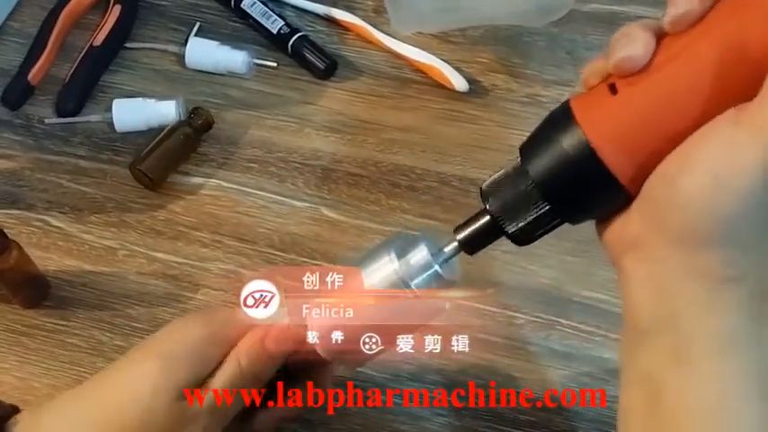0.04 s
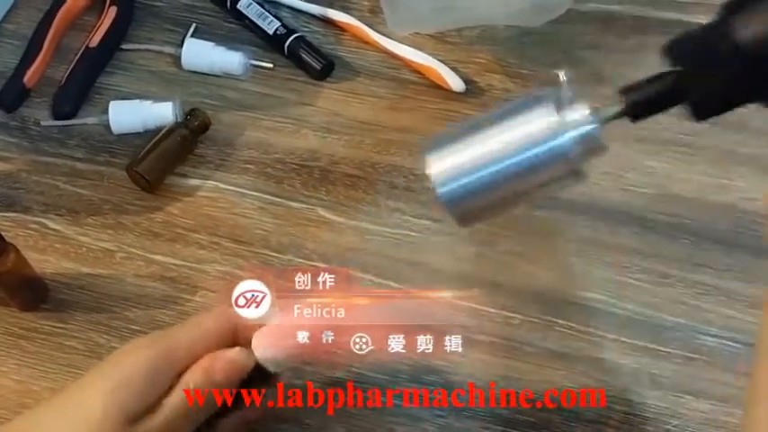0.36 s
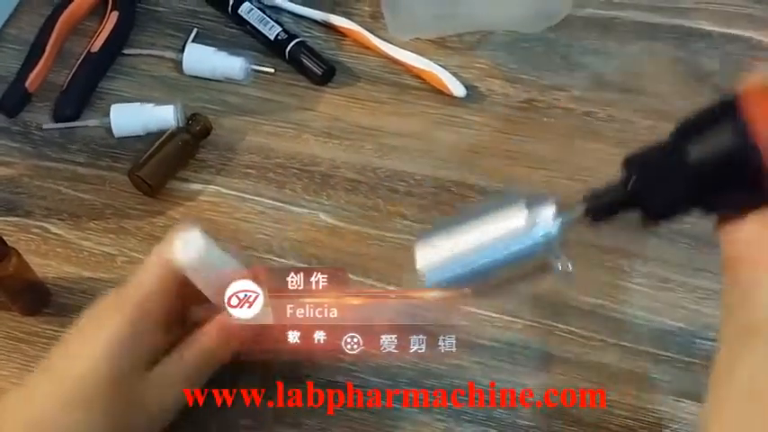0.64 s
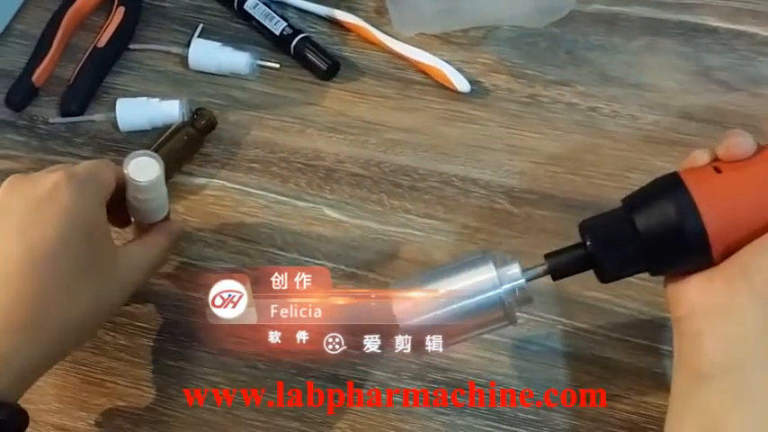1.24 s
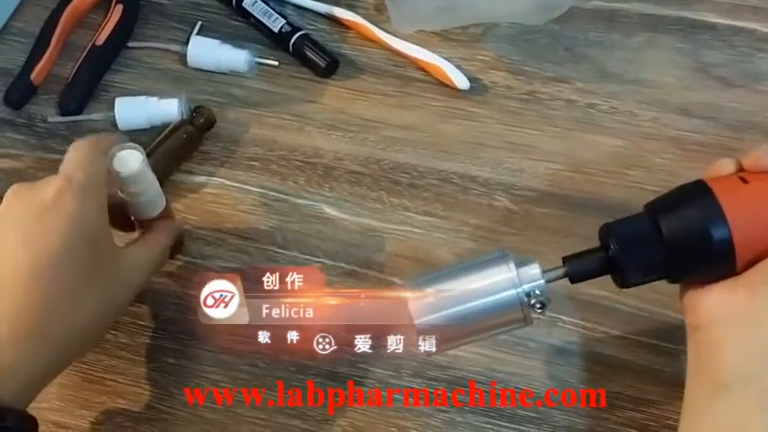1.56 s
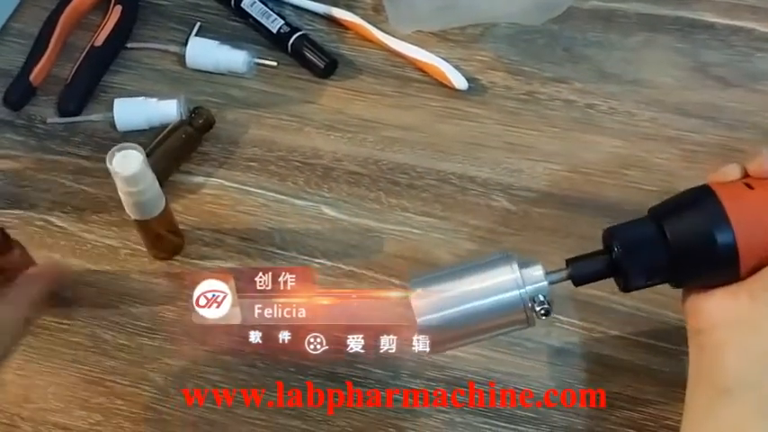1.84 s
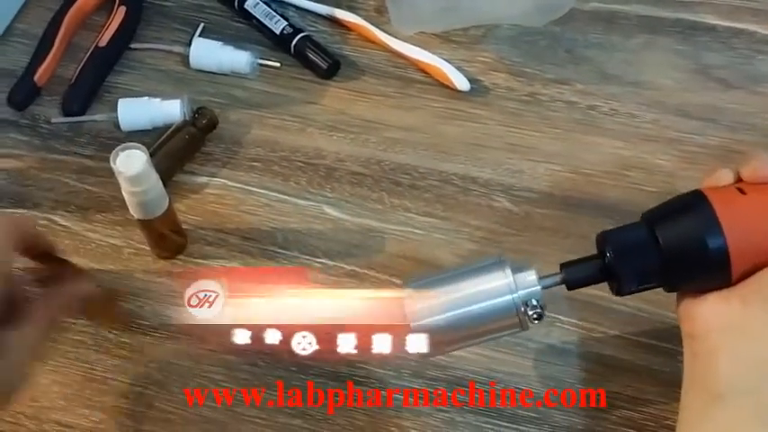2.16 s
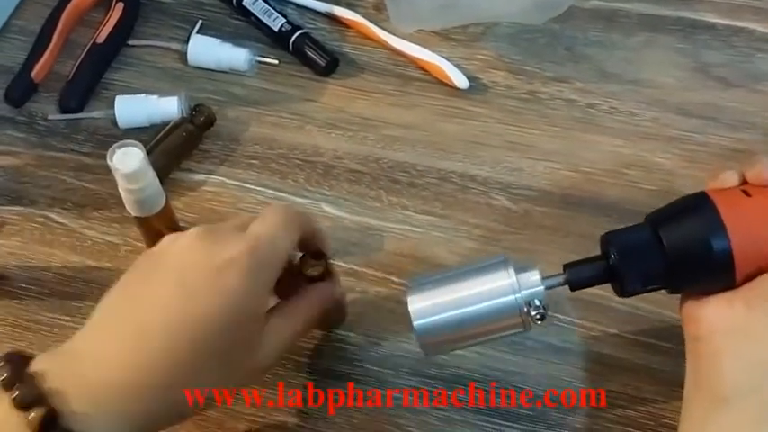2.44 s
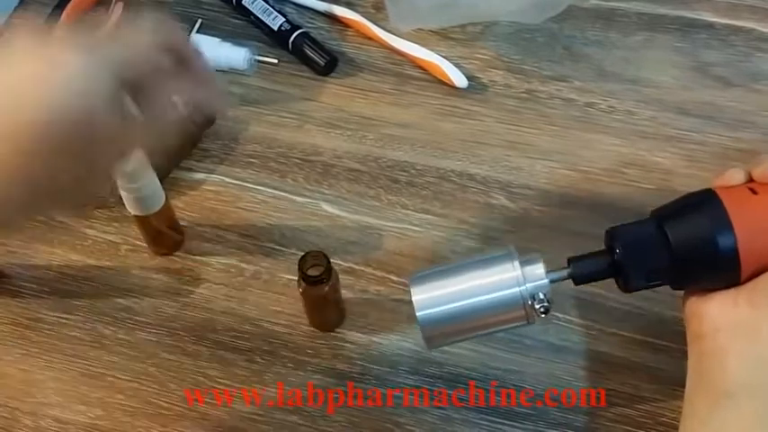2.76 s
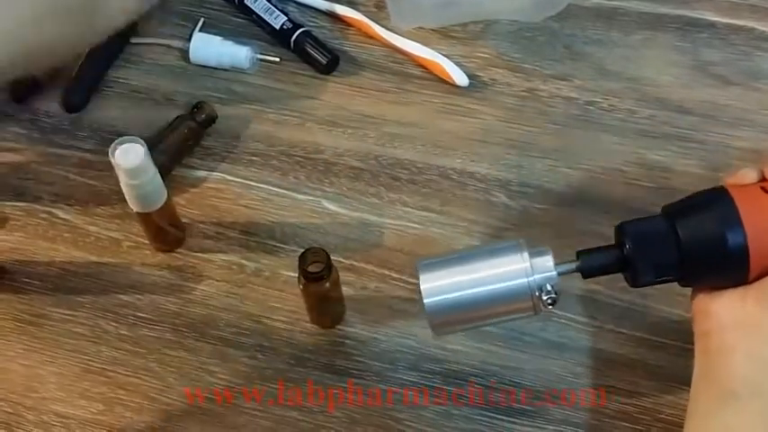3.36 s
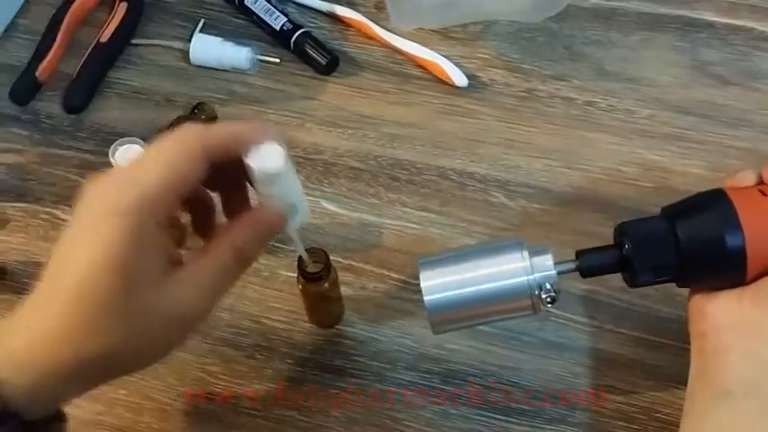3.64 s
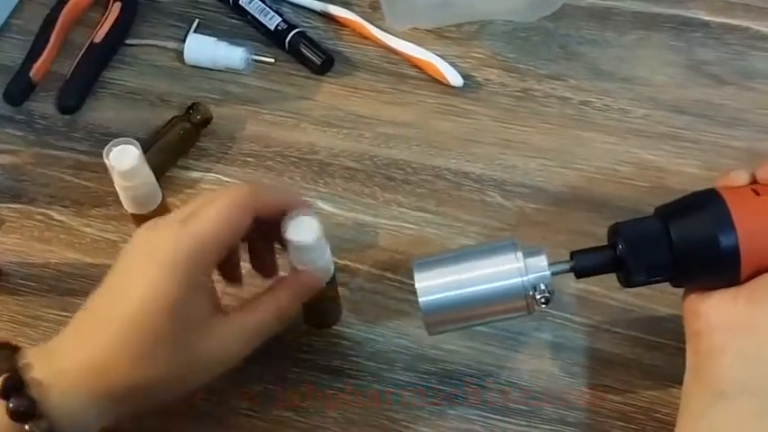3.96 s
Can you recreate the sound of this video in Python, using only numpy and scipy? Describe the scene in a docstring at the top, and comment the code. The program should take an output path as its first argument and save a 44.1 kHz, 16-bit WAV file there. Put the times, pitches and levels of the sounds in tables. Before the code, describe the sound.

Close up in a slightly echoing room, a small power tool spins, hissing and rattling, is laid on wood and coasts to a stop. Later a glass bottle knocks on the table, followed by light plastic clicks.

```python
"""Capping tool and spray bottle on a table

A handheld electric capping tool spins freely with hissing brushes, rattling gears and a squealing
bearing, is laid running on a wooden table, which drones under it, and coasts to a stop. A small glass
bottle is stood on the table, and a plastic spray head is picked up and clicks into its neck. The bare
room rings after every knock; a low hum and faint chirps, perhaps a bird outside, lie behind."""
import sys
import numpy as np
from scipy import signal
from scipy.fft import rfft, irfft
from scipy.io import wavfile

SR = 44100
rng = np.random.default_rng(int(sys.argv[2]) if len(sys.argv) > 2 else 0)


def to_wav(s):
    """Save 16-bit WAV."""
    ch = np.atleast_2d(s).T  # columns
    pcm = np.round(np.clip(ch, -1, 1) * 32767)  # PCM
    wavfile.write(sys.argv[1], SR, pcm.astype(np.int16))


N = 176400

# reverb decay by band: f/Hz, t60/s
ROOM_DECAY = [(150, 0.56), (500, 1), (1200, 0.74), (2600, 0.74), (5000, 0.69), (12000, 0.41)]
# EQ of the wall reflections: f/Hz, level/dB
WALL_EQ = [(30, 0), (3000, 0.5), (5000, -1.5), (8000, -6), (14000, -1)]
# EQ of the room tone: f/Hz, level/dB
AIR_EQ = [(15, 4), (25, -9.5), (189, -1.5), (305, -5.5), (466, -12), (577, -11.5), (772, -17.5), (837, -10),
          (956, -20), (1030, -19.5), (2070, -18), (2360, -13.5), (3080, -21.5), (3340, -25.5), (14400, -35)]
# far chirps: t/s, length/s, start f/Hz, end f/Hz, relative level/dB
CHIRPS = [(1.382, 0.071, 3037, 3143, -54.5), (1.472, .07, 9700, 8700, -59), (1.476, 0.095, 6080, 5620, -64),
          (1.54, 0.0395, 3234, 2640, -51), (1.573, 0.123, 2417, 2320, -60.5),
          (1.63, 0.098, 4700, 4390, -65.5), (2.054, 0.13, 2650, 2680, -62.5),
          (2.093, 0.057, 5930, 6010, -65.5), (2.675, 0.093, 5110, 4760, -65.5),
          (2.707, 0.087, 3920, 3480, -62.5), (2.995, 0.16, 3033, 2390, -62),
          (3.574, 0.071, 6080, 5560, -66.5), (3.558, 0.086, 2970, 3030, -65.5)]

# tool and bottle scuff the wood: t/s, level/dB, decay/s
SCUFFS = [(.925, -29.5, 0.018), (1.167, -35, 0.025), (1.84, -48, .012), (1.878, -37.5, 0.014)]
# resonances of a scuff: f/Hz, width/Hz, level/dB
SCUFF_BANDS = [(1070, 120, 0), (1240, 150, -9), (1700, 190, -15), (2500, 770, -19)]
# EQ that softens a scuff: f/Hz, level/dB
SCUFF_EQ = [(300, -11), (1000, 0), (2800, 0), (6000, -13), (14000, -18)]
# switch, cap and spray head: t/s, level/dB, tilt/(dB/octave), decay/s, ring f/Hz, relative ring level/dB
CLICKS = [(.001, -24, 2.5, 0.011, 800, -1.5), (1.037, -33.5, 7.5, .004, 5400, -2),
          (1.065, -46, 3, 0.0034, 1400, -9), (1.172, -32.5, 0, 0.0085, 356, -5.5),
          (1.354, -45.5, -2.5, 0.0034, 1075, -23), (2.2525, -31, 3, 0.0036, 2800, -9),
          (2.917, -55.5, 2.5, 0.0027, 8000, -3), (2.927, -42.5, -2.5, 0.015, 1630, -5.5),
          (3.673, -42, -5.5, 0.025, 1030, -12), (3.7562, -38, 0, 0.004, 2300, -12),
          (3.7586, -31.5, -2, 0.0051, 2220, -5), (3.7648, -28.5, -1, 0.0027, 7240, -7.5),
          (3.7662, -30.5, -2.5, 0.0024, 570, -3), (3.808, -46, -8.5, 0.0034, 1110, -7),
          (3.881, -39.5, -6.5, 0.0078, 2500, -3), (3.9359, -40, -2, .003, 3200, -21),
          (3.938, -32.5, 0.5, 0.0039, 2690, 0.5), (3.953, -40.5, -4.5, .015, 1318, 5)]
# EQ of a plastic click: f/Hz, level/dB
PLASTIC_EQ = [(120, -12.5), (300, -1), (600, -0.5), (1200, 8.5), (1800, 1), (2500, 2.5), (4000, -12),
              (8000, -10), (14000, -26.5)]

# tool, then bottle, lands: t/s, thud level/dB, table level/dB, glass level/dB, tilt/(dB/octave), pan/dB
KNOCKS = [(0.6561, -15.5, -18.5, -31, -1.3, 1), (2.254, -18, -23.5, -24.5, .5, 2.5)]
# EQ of a thud on wood: f/Hz, level/dB
WOOD_EQ = [(100, -21), (190, 5), (265, -10), (350, -1.5), (520, -5.5), (750, 2.5), (1200, 5), (1700, 3),
           (2700, 2), (4000, -12.5), (7000, -16), (11000, -17.5), (14000, -54)]
# ring of the table top: f/Hz, level/dB, t60/s
TABLE_MODES = [(208, -0.5, 0.14), (337.2, -0.5, 0.21), (381, -1.5, 0.084), (520.6, 3, 0.098),
               (663, -6, 0.053), (787, 6, 0.072), (857, -8.5, 0.38), (1083, 3, 0.2), (1275, 2, 0.056),
               (1390, -21, 0.053), (1757, -2.5, 0.22), (1835, -2.5, 0.17), (2150, -0.5, .1)]
# ring of the glass bottle: f/Hz, level/dB, t60/s
BOTTLE_MODES = [(2321, -9, 0.3), (2497, 0, 0.13), (2500, -24, 0.13), (2826, 5, 0.053), (3000, 5, .08),
                (3410, 3, 0.083)]

# rotor speed under power: t/s, speed/(turns/s)
ROTOR_SPEED = [(0, 155), (.05, 148), (.12, 161.2), (.27, 160), (.4, 162.4), (.6, 162.7), (1.03, 161.7)]
# EQ of the brush hiss: f/Hz, level/dB
BRUSH_EQ = [(1500, -18), (2500, -8.5), (3300, -8.5), (3850, -6.5), (4500, -9.5), (5300, -15.5), (5700, -8),
            (6200, -10), (6800, -9.5), (7450, 0.5), (8100, -4), (9100, -8), (9650, -3), (10100, -7),
            (10900, -5.5), (11550, -8), (12100, -1), (13000, -4), (13600, -2), (14400, -12)]
# EQ of the gear rattle: f/Hz, level/dB
GEAR_EQ = [(60, -14), (120, -6), (200, -4), (260, -7), (540, -8), (800, -7), (1200, -0.5), (2000, -2),
           (2450, -9.5), (3400, -10)]
# table resonances under the running tool: f/Hz, width/Hz, level/dB
DRONE_BANDS = [(195, 50, -25), (332, 68, -19), (850, 50, 13), (1134, 83, 18)]
# tones of rotor and gear teeth: multiple of rotor speed, level/dB
ROTOR_ORDERS = [(2, -59), (4, -61.5), (13, -43), (84, -53)]
# gear whine while coasting: t/s, f/Hz, level/dB
COAST_WHINE = [(1.04, 2050, -48.5), (1.085, 1646, -33), (1.15, 1220, -41), (1.21, 1020, -42),
               (1.25, 721.5, -49), (1.305, 623, -45.5), (1.35, 344, -59), (1.421, 100, -88)]
# pitch of the bearing squeal: t/s, f/Hz
SQUEAL_PITCH = [(0, 10950), (.18, 11550), (.4, 11640), (.6, 11646), (.68, 11680), (.95, 11676),
                (1.02, 11708)]
# envelope of the squeal: t/s, level/dB
SQUEAL_ENVELOPE = [(0, -45), (.08, -45.5), (.18, -61), (.35, -41.5), (.48, -38.5), (.59, -34.5),
                   (.68, -37.5), (.82, -36.5), (1.02, -39), (1.08, -59), (1.2, -95)]
# squeal and its sidebands: offset in multiples of the ball rate, level/dB
SQUEAL_BANDS = [(-2, -22), (-1, -2), (0, -8), (1, -6), (2, -20)]

# EQ of the right microphone against the left: f/Hz, level/dB
RIGHT_MIC_EQ = [(20, 1), (1500, -2.5), (2400, -4.5), (3600, 2), (6300, 1), (7500, 2.5), (8400, -0.5),
                (9300, 2.5), (10700, -13.5), (11600, 2.5), (12700, -14), (13600, -2), (14400, -9)]

LAID_S, OFF_S, COAST_S = KNOCKS[0][0], 1.063, 0.3  # tool lands, power goes off, length of the run-down


def undb(db):
    """Decibels to gain."""
    return 10 ** (np.asarray(db) / 20)


def unit(x):
    """Scale to rms 1."""
    return x / np.sqrt(np.mean(x ** 2))


def unit_hit(x):
    """Scale a hit so that its energy equals rms 1 for 10 ms."""
    return x / np.sqrt(np.sum(x ** 2, axis=-1, keepdims=True) / (SR * .01))


def pan(db):
    """Stereo gains, with the left ear db above the right."""
    return undb(np.array([[db], [-db]]) / 2)


def curve(t, points):
    """Straight lines through breakpoints."""
    return np.interp(t, *np.array(points).T)


def noise(channels=2):
    """White noise, unrelated in each ear."""
    return rng.standard_normal((channels, N))


def wide_noise():
    """Stereo noise, wide in the treble and nearly centred in the bass."""
    mid, side = noise()
    side = 0.79 * signal.sosfilt(signal.butter(1, 800, "high", fs=SR, output="sos"), side) + 0.21 * side
    return np.array([mid + side, mid - side]) / np.sqrt(2)


def wobble(hz):
    """Smooth random modulation of rms 1, low-passed at hz."""
    return unit(signal.sosfilt(signal.butter(2, hz, fs=SR, output="sos"), noise(channels=1)[0]))


def eq(x, points, tilt_db=0):
    """Minimum-phase EQ through (f/Hz, level/dB) points, tilted about 1 kHz, rolled off past both ends."""
    hz, db = np.array(points, float).T
    octaves = np.log2(np.maximum(np.fft.rfftfreq(2 * N, 1 / SR), 1) / 1000)
    knots = np.log2(hz / 1000)
    outside = np.clip(np.maximum(knots[0] - octaves, octaves - knots[-1]), 0, 2)
    gain = undb(np.interp(octaves, knots, db) + tilt_db * octaves - 24 * outside)
    cepstrum = irfft(np.log(gain))
    cepstrum[1:N] *= 2
    cepstrum[N + 1:] = 0
    return irfft(rfft(x, 2 * N) * np.exp(rfft(cepstrum)))[..., :N]


def resonate(x, bands):
    """Parallel resonators, each (f/Hz, width/Hz, level/dB)."""
    return sum(undb(db) * signal.lfilter(*signal.iirpeak(hz, hz / width, fs=SR), x)
               for hz, width, db in bands)


def ring(modes, t):
    """A struck body's fading modes, each reaching the two ears in its own phase."""
    out = 0
    for hz, db, t60 in modes:
        cycles = hz * t + rng.random() + rng.random((2, 1)) / 4
        out += undb(db - 60 * t / t60) * np.sin(2 * np.pi * cycles)
    return unit_hit(out)


def add(out, start, x):
    """Mix a sound in at its time."""
    i = int(max(start, 0) * SR)
    x = x[:, :N - i]
    out[:, i:i + x.shape[1]] += x


def room(x, wet_db):
    """Direct sound plus a diffuse tail that dies sooner in the treble."""
    t, hz = np.arange(SR) / SR, np.fft.rfftfreq(SR, 1 / SR)
    spectrum = rfft(wide_noise()[:, :SR])
    centres, t60s = np.array(ROOM_DECAY).T
    tail = sum(irfft(spectrum * np.interp(hz, centres, band)) * undb(-60 * t / t60)
               for band, t60 in zip(np.eye(len(centres)), t60s))
    tail = unit(tail * (1 - np.exp(-t / 0.0022))) / np.sqrt(SR)
    return x + undb(wet_db) * eq(signal.fftconvolve(x, tail, axes=1)[:, :N], WALL_EQ)


def room_tone(t, hum_hz=49.5):
    """A bed of steady air with a wavering low hum."""
    air = unit(eq(wide_noise(), AIR_EQ)) * undb(-52 + 0.25 * wobble(12))
    hum = undb(-57) * (1 + 0.14 * wobble(3.5)) * np.sin(2 * np.pi * hum_hz * t)
    return (air + hum) * pan(1.96)


def chirps(t):
    """Faint rough glides, heard mostly through the room."""
    out, rasp = np.zeros((2, N)), 1 + 0.0468 * wobble(347)
    for start, length, from_hz, to_hz, db in CHIRPS:
        progress = t[:int(length * SR)] / length
        hz = (from_hz + (to_hz - from_hz) * progress) * rasp[int(start * SR):][:len(progress)]
        envelope = np.sin(np.pi * progress) ** .5 * undb(db)
        add(out, start, envelope * np.sin(2 * np.pi * np.cumsum(hz) / SR) * pan(6))
    return room(out, wet_db=18.2) * undb(-8)


def burst(t, decay):
    """Noise with an instant attack and an exponential fade."""
    return wide_noise() * np.exp(-np.minimum(t / decay, 20))


def scuffs(t):
    """Tool and bottle rub the wood in short, soft scrapes."""
    out = np.zeros((2, N))
    for start, db, decay in SCUFFS:
        rub = resonate(burst(t, decay), SCUFF_BANDS)
        add(out, start, unit_hit(eq(rub, SCUFF_EQ)) * undb(db))
    return out


def clicks(t, ring_q=5.1):
    """Small plastic parts snap and ring briefly."""
    out = np.zeros((2, N))
    for start, db, tilt_db, decay, ring_hz, ring_db in CLICKS:
        touch = burst(t, decay)
        snap = unit_hit(eq(touch, PLASTIC_EQ, tilt_db))
        ping = unit_hit(resonate(touch, [(ring_hz, ring_hz / ring_q, 0)]))
        add(out, start, undb(db) * (snap + undb(ring_db) * ping))
    return out


def knocks(t, hold_s=0.012, fall_s=0.0018):
    """Tool and bottle land: a crack, a brief chatter of contact, and the ring of table and glass."""
    thuds, rings, ring_t = np.zeros((2, N)), np.zeros((2, N)), t[:SR // 2]
    crack = undb(-12) * unit_hit(1. * (t == 0))
    for start, thud_db, table_db, glass_db, tilt_db, pan_db in KNOCKS:
        chatter = unit_hit(wide_noise() * np.exp(-np.maximum(t - hold_s, 0) / fall_s))
        thud = undb(thud_db) * unit_hit(eq(chatter + crack, WOOD_EQ, tilt_db))
        table = undb(table_db) * ring(TABLE_MODES, ring_t)
        glass = undb(glass_db) * ring(BOTTLE_MODES, ring_t) * pan(4.4)
        add(thuds, start, thud * pan(pan_db))
        add(rings, start, (table + glass) * pan(pan_db))
    return room(thuds, wet_db=0) + room(rings, wet_db=-7)


def brush_hiss(angle, spin, laid):
    """The brushes rub with a gritty hiss that throbs once a turn."""
    throb = 0.12 * np.cos(angle / 2) ** 8
    contact = np.exp(throb + 0.16 * wobble(1700) + 0.043 * wobble(46))
    return unit(eq(noise() * contact, BRUSH_EQ)) * spin ** 0.97 * undb(-30.5 - 0.5 * laid)


def gear_rattle(spin, laid):
    """The gears churn, and shake a drone out of the table once the tool lies on it."""
    rattle = wide_noise() * np.exp(.35 * wobble(450) + .15 * wobble(22)) * spin
    gears = unit(eq(rattle, GEAR_EQ)) * undb(-36.5)
    drone = unit(resonate(rattle, DRONE_BANDS)) * undb(-48) * laid
    return (gears + drone) * np.sqrt(np.mean(spin))  # the levels hold for the time the tool runs


def rotor_tones(angle, spin, laid):
    """Rotor and gear teeth sing at multiples of the rotor speed, ducking as the tool is laid down."""
    tones = sum(undb(db) * np.sqrt(2) * (1 + .5 * wobble(18)) * np.sin(order * angle)
                for order, db in ROTOR_ORDERS)
    return tones * spin * undb(-9.5 * laid)


def gear_whine(t, spin):
    """The coasting gears give a rough, fluttering whine that dives until the rotor stops."""
    times, hz, db = np.array(COAST_WHINE).T
    pitch = np.interp(t, times, hz) * (1 + .06 * wobble(203))
    envelope = undb(np.interp(t, times, db)) * (1 + .6 * wobble(51)) * (spin > 0)
    return envelope * np.sin(2 * np.pi * np.cumsum(pitch) / SR)


def bearing_squeal(t, spin, ball_hz=100):
    """The bearing gives a thin, high squeal with flickering sidebands spaced at the ball rate."""
    cycles = np.cumsum(curve(t, SQUEAL_PITCH) * (1 + 0.00037 * wobble(40))) / SR
    squeal = 0
    for offset, db in SQUEAL_BANDS:
        gain = undb(db) * (1 + 0.21 * wobble(15))
        squeal += gain * np.sin(2 * np.pi * (cycles + offset * ball_hz * t + rng.random()))
    return squeal * undb(curve(t, SQUEAL_ENVELOPE)) * spin


def capping_tool(t):
    """The motor spins, then coasts down and takes every layer with it; tones and squeal stay dry."""
    spin = np.clip(1 - (t - OFF_S) / COAST_S, 0, 1) ** 1.15  # 1 under power, 0 at rest
    speed = curve(t, ROTOR_SPEED) * spin * (1 + 0.003 * wobble(13))
    angle = 2 * np.pi * np.cumsum(speed) / SR
    laid = np.clip((t - LAID_S) / 0.014, 0, 1)  # 0 in the hand, 1 on the table
    hiss = brush_hiss(angle, spin, laid) * pan(4.5)
    rattle = gear_rattle(spin, laid) * pan(2)
    tones = rotor_tones(angle, spin, laid) * pan(2)
    whine = gear_whine(t, spin) * pan(2)
    squeal = bearing_squeal(t, spin) * pan(22)
    return room(hiss + rattle + whine, wet_db=-7.5) + tones + squeal


def scene():
    """Tool, knocks and handling up front, chirps and room tone behind."""
    t = np.arange(N) / SR
    foreground = capping_tool(t) + knocks(t)
    handling = room((scuffs(t) + clicks(t)) * pan(2), wet_db=-1.5)
    return foreground + handling + chirps(t) + room_tone(t)


def record(dry):
    """The right microphone is duller than the left; a steep low-pass cuts the top of both."""
    mics = np.array([dry[0], eq(dry[1], RIGHT_MIC_EQ)])
    return signal.sosfilt(signal.ellip(10, .2, 80, 14650, fs=SR, output="sos"), mics)


dry = scene()
out = record(dry)
to_wav(out)
```